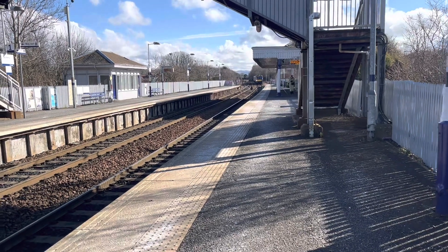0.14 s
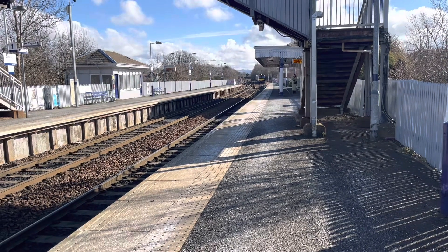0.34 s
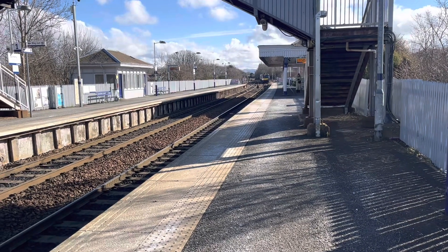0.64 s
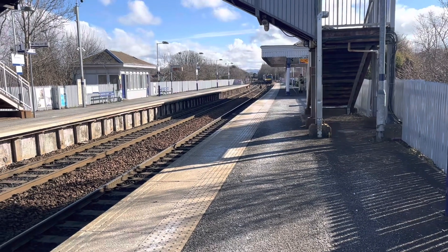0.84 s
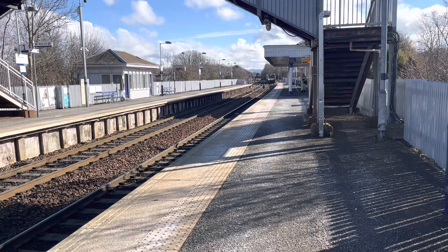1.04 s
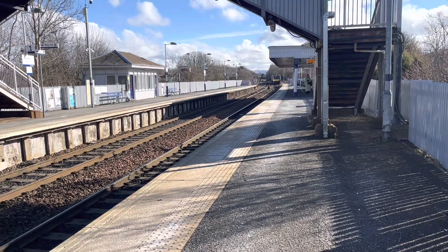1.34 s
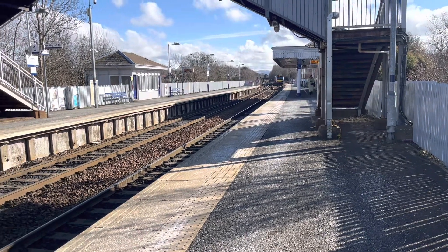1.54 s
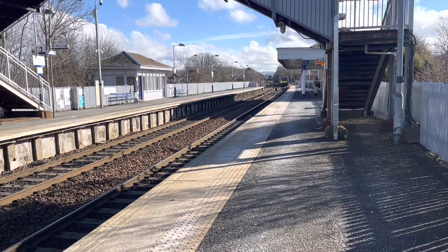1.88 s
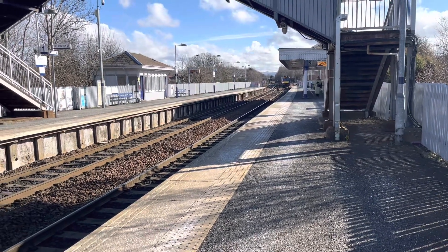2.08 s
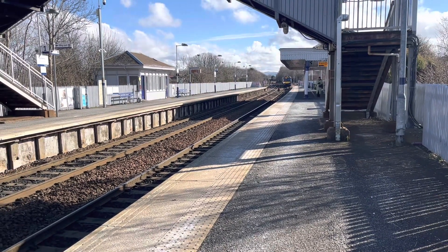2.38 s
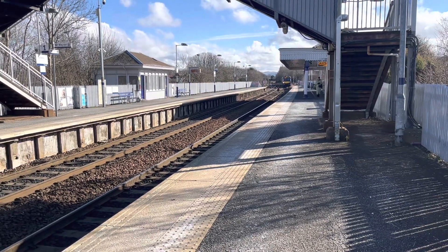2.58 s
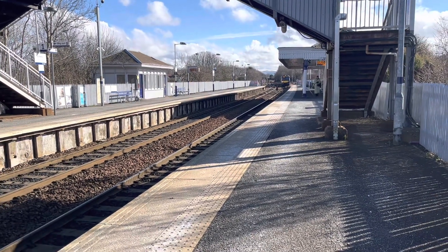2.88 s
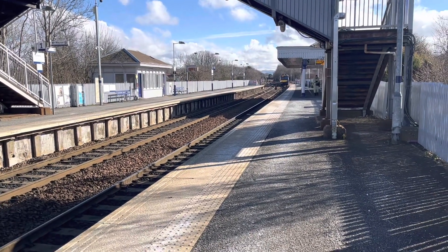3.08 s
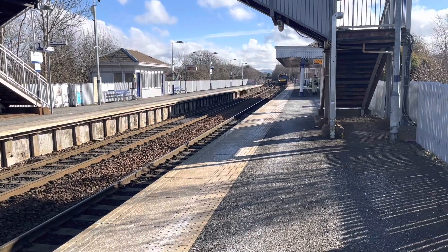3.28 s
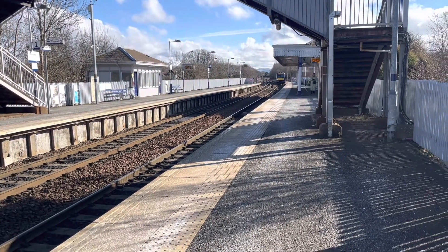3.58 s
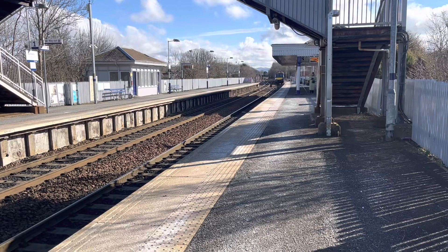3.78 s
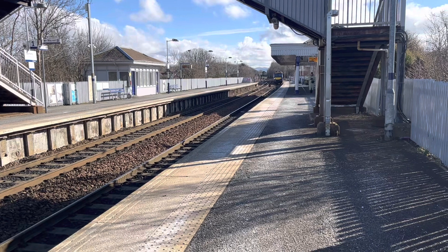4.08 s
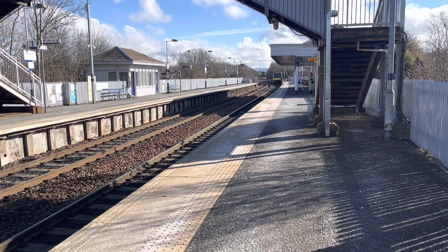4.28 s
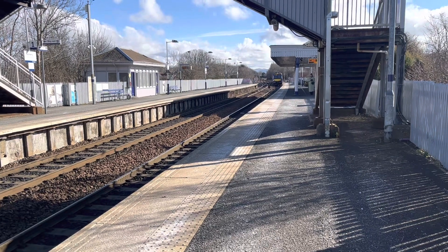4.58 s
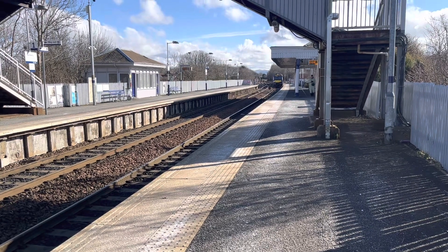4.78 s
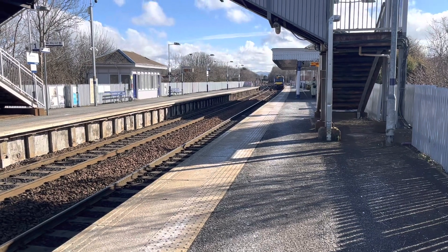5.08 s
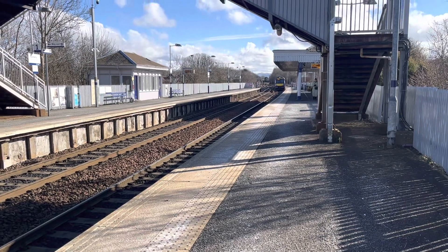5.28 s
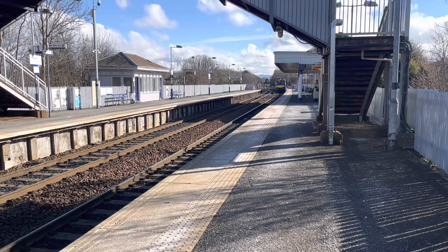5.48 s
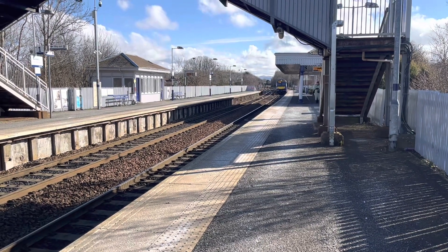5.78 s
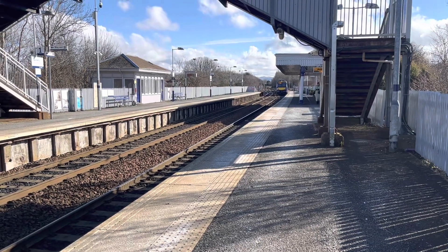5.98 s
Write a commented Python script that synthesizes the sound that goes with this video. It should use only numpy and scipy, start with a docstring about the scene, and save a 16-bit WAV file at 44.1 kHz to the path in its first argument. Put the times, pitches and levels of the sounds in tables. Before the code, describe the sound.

Low far-off train rumble with a wavering engine hum, soft wind buffets on the microphone, faint birdsong in trees and crisp nearby clicks.

```python
"""A diesel train, still far off down the line from an open station platform, heard as a roar and a hum.
The roar is noise in octave bands that swell a little apart; the hum is two sines of wandering pitch.
Narrow-band noise and short decaying swings make low gusty throbs; an airy noise hiss swells at both ends.
Gliding near-sines make small birds whistle and tick in the trees, partly returned as decaying echoes.
Dry clicks close to the microphone are short rings that dive in pitch, trailed by fine crackle."""
import sys
import numpy as np
from scipy import signal
from scipy.fft import rfft, irfft, next_fast_len
from scipy.io import wavfile

SR = 44100
rng = np.random.default_rng(int(sys.argv[2]) if len(sys.argv) > 2 else 0)


def put_to_file(sound):
    """Save the sound as 16-bit audio at rate SR, in the file named by the first command-line argument."""
    columns = np.atleast_2d(sound).T  # one column per channel
    safe = np.clip(columns, -1, 1)
    whole_steps = np.round(safe * 32767)
    wavfile.write(sys.argv[1], SR, whole_steps.astype(np.int16))


N = 270333   # length in samples


def amp(db):
    """Decibel law: 20 dB is a factor of ten in amplitude."""
    return 10 ** (np.asarray(db) / 20)


def rms_one(x):
    """Normalization of the root-mean-square value to 1."""
    return x / np.sqrt(np.mean(x ** 2) + 1e-20)


def in_time(rows):
    """Linear interpolation of each column between the times in the first one."""
    s, *columns = np.transpose(rows)
    return [np.interp(np.arange(N) / SR, s, column) for column in columns]


def band_pass(x, low_hz, high_hz, order=2):
    """Band limitation by a Butterworth filter."""
    return signal.sosfilt(signal.butter(order, [low_hz, high_hz], "band", fs=SR, output="sos"), x)


def drift(rate):
    """Random modulation: low-passed noise of rms 1, with two poles at rate in Hz."""
    step = 40   # samples between computed values
    pole = np.exp(-2 * np.pi * rate * step / SR)
    noise = rng.standard_normal(N // step + 2002)
    slow = signal.lfilter([1], [1, -2 * pole, pole ** 2], noise)[2000:]   # settled part only
    return np.interp(np.arange(N) / step, np.arange(len(slow)), rms_one(slow))


def panned(x, pan_db, lead_s=0.):
    """Stereo by level and time difference: the left is louder by pan_db and earlier by lead_s."""
    at = np.arange(N)
    left = np.interp(at + lead_s * SR, at, x)
    return np.array([amp(pan_db / 2) * left, amp(-pan_db / 2) * x])


def echoes(x, t60):
    """Scattering from trees and fences: exponentially decaying noise tails, independent on each side."""
    t = np.arange(round(.3 * SR)) / SR
    tails = rng.standard_normal((2, len(t))) * amp(-60 * t / t60) * (t > .004)
    tails /= np.sqrt(np.sum(tails ** 2, axis=1, keepdims=True))   # unit energy
    return signal.fftconvolve(x[None], tails, axes=1)[:, :N]


# Low rumble between the buffets. Each row: time in seconds, rms level in dB.
THROB_LEVEL = [(0.0, -36), (0.15, -47), (0.53, -41.5), (1.33, -43), (2.03, -44), (2.24, -40), (2.49, -43),
               (3.46, -42), (3.82, -41.5), (4.08, -35.5), (4.42, -38.5), (4.56, -40), (4.97, -38),
               (5.57, -43), (6.13, -45)]
# Low buffets, probably wind over the microphone.
# Each row: time of the peak in seconds, peak of the fundamental in dB, pitch in Hz, rise (Gaussian) in seconds.
BUFFETS = [(0.035, -42, 64.6, 0.0034), (0.671, -29, 70.6, 0.012), (1.691, -31.5, 73, 0.015),
           (2.188, -26, 71.7, 0.02), (2.24, -29.5, 55.5, 0.025), (2.313, -32, 61.4, 0.015),
           (2.501, -29.5, 88.7, 0.023), (2.684, -30.5, 72.4, 0.013), (2.786, -34.5, 69, 0.027),
           (3.109, -31, 66.5, 0.019), (3.405, -32, 67.4, 0.023), (3.85, -36, 58.4, .01),
           (3.931, -25, 62.3, 0.037), (3.994, -31, 68.7, 0.015), (4.046, -27.5, 57.4, 0.0081),
           (4.212, -26, 67, 0.015), (4.34, -32.5, 75.5, 0.013), (4.756, -28.5, 70, 0.016),
           (5.113, -33, 76.3, 0.041), (5.18, -40, 65.5, 0.013), (5.462, -33.5, 74.8, 0.065),
           (5.763, -29, 71, 0.024), (6.06, -31, 59.6, 0.011)]
# Eddies, opposite in sign in the two channels. Each row: time in seconds, mean level in dB.
EDDIES_LEVEL = [(0, -45), (.3, -52), (.6, -73.5), (2.2, -86.5), (2.4, -52.5), (2.6, -73), (3.5, -68),
                (3.75, -57.5), (4.3, -66.5), (4.7, -52), (5.0, -60), (5.7, -72.5)]
BUFFET_FALL_S = 0.0084   # Gaussian fall of a buffet of -32 dB
FALL_GROWTH = 0.89   # stronger buffets die away more slowly, dB of time per dB
BUFFET_OCTAVE_DB = -17   # lopsided swings add the octave


def buffets():
    """Transient oscillation: a few low swings under a Gaussian rise and a Gaussian fall."""
    out, t = np.zeros(N), np.arange(N) / SR
    start_phases = rng.uniform(0, 2 * np.pi, len(BUFFETS))
    for (s, db, hz, rise_s), start_phase in zip(BUFFETS, start_phases):
        near = slice(max(round((s - .15) * SR), 0), round((s + .2) * SR))
        since = t[near] - s
        fall_s = BUFFET_FALL_S * amp(FALL_GROWTH * (db + 32.0))
        shape = np.exp(-.5 * (since / np.where(since < 0, rise_s, fall_s)) ** 2)
        phase = 2 * np.pi * hz * since + start_phase
        swings = np.sin(phase) + amp(BUFFET_OCTAVE_DB) * np.cos(2 * phase)
        out[near] += amp(db) * shape * swings
    return out


def throb():
    """Modulated narrow-band noise with buffets, common to both channels, plus antiphase eddies."""
    level_db, = in_time(THROB_LEVEL)
    eddies_db, = in_time(EDDIES_LEVEL)
    shared, own = band_pass(rng.standard_normal((2, N)), 48, 90)
    rumble = rms_one(shared * amp(2.0 * drift(9.3))) * amp(level_db)
    eddies = rms_one(own) * amp(eddies_db + 2.5 * drift(6.7))
    return rumble + buffets() + eddies * np.array([[1], [-1]])


# Airy hiss in the treble. Each row: time in seconds, mean level in dB.
AIRY_LEVEL = [(0, -69), (.42, -70.5), (.56, -88.5), (5.1, -102), (5.28, -78), (5.5, -100), (5.66, -99),
              (5.71, -79), (5.86, -72.5), (5.94, -67.5), (5.98, -75), (6.13, -79)]


def airy():
    """Broad-band noise, grainy by fast modulation, strongest low down; precedence places it at the left."""
    level_db, = in_time(AIRY_LEVEL)
    grainy = amp(1.3 * drift(250.0)) * rng.standard_normal((2, N))
    shared, own = band_pass(grainy, 1300, 13800)
    hiss = shared + 0.2 * own * np.array([[1], [-1]])
    lower_part = signal.sosfilt(signal.butter(2, 4000, fs=SR, output="sos"), hiss)
    hiss = hiss + amp(8.5) * lower_part
    hiss[1] = np.roll(hiss[1], 1)   # it reaches the right microphone a sample later
    return rms_one(hiss) * amp(level_db + 2.1 * drift(6.4))


def whistles(notes, flutter_db, wobble_hz, swell_db, fade_db, scoop_hz=0, scoop_s=.01,
             glide_hz_per_s=0, overtone_db=-60):
    """Frequency modulation: near-sines scoop into pitch, glide, swell and fade; scattering makes them flutter."""
    out = np.zeros(N)
    flutter = amp(flutter_db * (.7 * drift(20.0) + .7 * drift(90.0)))
    wobble = wobble_hz * drift(90.0)
    scoops = np.broadcast_to(scoop_hz, len(notes))
    glides = np.broadcast_to(glide_hz_per_s, len(notes))
    for (s, length, hz, db, loudest), scoop, glide in zip(notes, scoops, glides):
        at, t = round(s * SR), np.arange(round(length * SR)) / SR
        pitch = hz + scoop * np.exp(-t / scoop_s) + glide * t + wobble[at:at + len(t)]
        phase = 2 * np.pi * np.cumsum(pitch) / SR
        below_peak_db = np.interp(t / length, [0, np.clip(loudest, .02, .98), 1], [swell_db, 0, fade_db])
        ends = np.clip(np.minimum(t, length - t) / .007, 0, 1)
        voice = np.sin(phase) + amp(overtone_db) * np.sin(2 * phase)
        out[at:at + len(t)] += np.sqrt(2) * amp(db - below_peak_db) * ends * voice
    return out * flutter


def sung(curves, flutter_db, wobble_hz, overtone_db=-60):
    """Frequency modulation: near-sines follow pitch and level curves; scattering makes them flutter."""
    out, wobble = np.zeros(N), wobble_hz * drift(90.0)
    for s, hz, db in map(np.transpose, curves):
        t = np.arange(round((s[-1] - s[0]) * SR)) / SR
        at = round(s[0] * SR)
        near = slice(at, at + len(t))
        pitch = np.interp(t + s[0], s, hz) + wobble[near]
        phase = 2 * np.pi * np.cumsum(pitch) / SR
        ends = np.clip(np.minimum(t, t[-1] - t) / .004, 0, 1)
        voice = np.sin(phase) + amp(overtone_db) * np.sin(2 * phase)
        out[near] += np.sqrt(2) * amp(np.interp(t + s[0], s, db)) * ends * voice
    return out * amp(flutter_db * drift(150.0))


# Faint far-off birds that blur together: notes per second, lowest note level in dB, range of first pitches in Hz.
TWITTER_PER_S, TWITTER_FLOOR_DB, TWITTER_HZ = 30.0, -92, (4200, 5700)


def twitter():
    """Random superposition: short faint notes at chance moments and pitches, falling or rising."""
    count = round(TWITTER_PER_S * N / SR)
    moment, length, pitch, level, glide = rng.random((count, 5)).T
    notes = np.transpose([moment * (N / SR - .1),
                          .02 + .06 * length,
                          np.interp(pitch, [0, 1], TWITTER_HZ),
                          TWITTER_FLOOR_DB + 6 * level,
                          np.full(count, .4)])
    return whistles(notes, 4.0, 120, swell_db=6, fade_db=6, glide_hz_per_s=12000 * (glide - .7))


# Upward ticks of a small bird. Each row: start in seconds, peak in dB.
TICK_TIMES = [(2.123, -65), (2.305, -66.5), (4.859, -65), (4.972, -66), (5.065, -66), (5.196, -68)]


def ticks():
    """Linear chirp: each tick sweeps upward within a hundredth of a second."""
    out, t = np.zeros(N), np.arange(round(.009 * SR)) / SR
    sweep = np.hanning(len(t)) * signal.chirp(t, 5800, t[-1], 7900)
    for s, db in TICK_TIMES:
        at = round(s * SR)
        out[at:at + len(t)] += amp(db) * sweep
    return out


# Whistles that climb in steps, one curve each. Each row of a curve: time in seconds, pitch in Hz, level in dB.
RISING_CURVES = [
    [(.3, 3540, -80), (.345, 3570, -77), (.37, 3800, -74), (.422, 3940, -71), (.462, 3880, -77),
     (.49, 4060, -80), (.55, 4140, -86)],
    [(1.8, 3850, -87), (1.836, 3950, -73), (1.847, 4000, -79), (1.89, 4070, -62.5), (1.93, 4070, -79),
     (1.95, 4100, -81.5), (2.01, 4130, -79.5), (2.056, 4155, -84)],
    [(3.755, 3350, -80), (3.787, 3800, -76.5), (3.855, 3860, -73), (3.875, 3940, -74), (3.913, 4030, -72),
     (3.927, 4060, -85), (3.94, 4050, -71.5), (3.975, 4200, -81), (4.05, 4240, -81)],
    [(5.418, 3560, -88), (5.435, 3740, -70), (5.465, 3730, -80.5), (5.505, 3910, -72), (5.528, 4120, -76),
     (5.562, 3980, -70), (5.584, 4220, -69), (5.63, 4100, -73), (5.692, 4240, -82)],
]
# Low rising notes that follow the whistles. Each row: start in seconds, length in seconds,
# first pitch in Hz, loudest level in dB, loudest point as a share of the length.
LOW_NOTES = [(.78, 0.07, 2800, -78, .5), (2.07, 0.16, 2706, -73, 0.65), (4.07, 0.12, 2716, -71.5, 0.74),
             (5.75, 0.14, 2700, -73, 0.31)]
# Short notes, mostly falling. Each row: start in seconds, length in seconds, pitch in Hz, loudest level in dB,
# loudest point as a share of the length, starting offset of the pitch in Hz, sag in Hz per second.
SHORT_NOTES = [(.11, 0.091, 4200, -82, .3, 0, 500), (0.283, 0.072, 3150, -76, .6, 0, 4002),
               (0.3, .025, 3950, -75, .4, 100, 3000), (0.574, 0.084, 5060, -75, .4, -150, 5996),
               (0.663, 0.04, 4240, -78, 0.28, -150, 3000), (2.887, 0.053, 4780, -73.5, 0.7, 505, 502),
               (3.014, 0.029, 4830, -72.5, 0.51, 300, 299), (3.32, .045, 4950, -89, .6, 148, 2002),
               (4.186, 0.07, 4580, -71, 0.32, -350, 5000), (4.715, 0.11, 4940, -75.5, 0.43, -150, 2987.5),
               (5.092, 0.071, 5100, -77.5, 0.44, 300, 1008), (5.395, 0.045, 4750, -76.5, .4, -200, -2000),
               (5.714, 0.064, 4660, -69, 0.65, -300, 2497), (5.943, 0.059, 1925, -65, .4, 0, -4000)]
LOW_CLIMB_HZ_PER_S, SHORT_SCOOP_S = 2200, 0.011


def songbird():
    """Superposition of pitch glides: rising whistles, low notes and short notes of a bird farther off."""
    *short, scoop_hz, sag = np.transpose(SHORT_NOTES)
    rising = sung(RISING_CURVES, 3.8, 45)
    low = whistles(LOW_NOTES, 3.5, 35, swell_db=5, fade_db=6, glide_hz_per_s=LOW_CLIMB_HZ_PER_S)
    brief = whistles(np.transpose(short), 4.0, 65, swell_db=8.5, fade_db=4,
                     scoop_hz=scoop_hz, scoop_s=SHORT_SCOOP_S, glide_hz_per_s=-sag)
    return rising + low + brief


# Lower voice of two-voiced calls. Each row of a curve: time in seconds, pitch in Hz, level in dB.
LOWER_VOICE = [
    [(.915, 5930, -77), (.937, 5710, -59.5), (.979, 5711, -79), (1.009, 5660, -64.5), (1.035, 5460, -66),
     (1.05, 5360, -90)],
    [(1.863, 5770, -74), (1.878, 5590, -67.5), (1.946, 5640, -65.5), (1.964, 5550, -81), (2.03, 5410, -84)],
    [(3.14, 5880, -82), (3.154, 5660, -72), (3.216, 5640, -69), (3.24, 5570, -70), (3.265, 5500, -73),
     (3.295, 5520, -78)],
    [(3.392, 5930, -76), (3.41, 5820, -66), (3.5, 5600, -73.5), (3.512, 5660, -91), (3.525, 5700, -85),
     (3.59, 5700, -80)],
    [(5.268, 5830, -74), (5.292, 5790, -67.5), (5.34, 5630, -64), (5.364, 5644, -61.5), (5.39, 5350, -75),
     (5.415, 5500, -73.5)],
]
# Upper voice of the calls. Each row of a curve: time in seconds, pitch in Hz, level in dB.
UPPER_VOICE = [
    [(.922, 6120, -73), (.985, 6125, -66), (1.01, 6070, -77), (1.03, 6000, -68), (1.07, 5980, -87)],
    [(1.878, 5860, -84), (1.909, 5940, -73.5), (1.935, 6080, -79), (1.985, 6135, -84), (2.0, 6120, -92)],
    [(3.133, 5990, -84), (3.145, 5945, -67), (3.18, 5970, -69), (3.211, 6075, -72), (3.24, 6000, -74),
     (3.28, 6000, -86)],
    [(3.408, 5850, -76), (3.428, 6020, -71), (3.45, 6070, -82), (3.5, 6055, -87)],
    [(5.27, 6060, -81), (5.336, 6068, -77), (5.4, 6095, -84)],
]


def two_voices():
    """Two independent oscillators: a falling lower voice with an arching one just above it."""
    return sung(LOWER_VOICE, 2.5, 35, overtone_db=-36.0) + sung(UPPER_VOICE, 4.7, 55, overtone_db=-30.0)


# Thin high notes. Each row: start in seconds, length in seconds, first pitch in Hz,
# loudest level in dB, loudest point as a share of the length.
HIGH_NOTES = [(2.01, 0.13, 8250, -70, .7)]


def birds():
    """Direct and scattered sound: four panned singers and a far twitter, partly returned by the trees."""
    near, far, tick = two_voices(), songbird(), ticks()
    high = whistles(HIGH_NOTES, 3.0, 30, swell_db=7, fade_db=2, glide_hz_per_s=-1500)
    direct = panned(near, 1.5, lead_s=.00006) + panned(far, 8.4, lead_s=.00004)
    direct += panned(high, .1, lead_s=.00006) + panned(tick, .1, lead_s=.00004)
    returned = amp(-4) * echoes(near, t60=.33) + amp(-2) * echoes(far, t60=0.3)
    returned += amp(-3) * echoes(tick, t60=.2)
    return direct + returned + echoes(twitter(), t60=.25)   # the twitter is heard only scattered


# Dry clicks nearby. Each row: start in seconds, peak of the ring in dB, ring pitch in Hz, left minus right in dB.
CLICK_RINGS = [(.656, -65, 7000, 2), (.962, -53, 5600, -1), (1.321, -57, 5960, -2), (1.468, -56, 6000, -13),
               (1.468, -59, 12300, 0), (1.472, -53, 9800, -1), (1.485, -56, 12500, 0),
               (1.488, -45, 4620, 6), (1.499, -46.5, 3700, 8), (1.4995, -61, 10300, 0),
               (1.575, -53, 3400, 5), (1.621, -60.5, 3500, 11), (1.512, -67, 5000, 3),
               (1.535, -68, 9800, 9), (1.675, -61, 5170, 7), (1.841, -59, 2500, -2), (1.881, -63, 4600, 0),
               (2.045, -74, 7000, 4), (2.25, -56.5, 4440, 2), (2.278, -72, 7000, 1), (3.128, -64, 4820, 15),
               (3.219, -47.5, 1700, -6), (3.221, -60, 3000, -2), (3.445, -49.5, 1160, 3),
               (3.447, -43.5, 1770, 1), (3.45, -43.5, 2180, 2), (4.273, -49.5, 9300, -1),
               (4.28, -50, 4830, -19), (4.2847, -42.5, 4070, 10), (4.292, -73, 9400, -1),
               (4.309, -58, 4300, 2), (4.341, -46, 2930, 4), (4.349, -53, 2600, -4), (4.378, -58, 4000, 1),
               (4.384, -49.5, 2200, 3.5), (4.398, -56, 4200, -2), (4.407, -48.5, 4360, 3),
               (4.438, -54, 3400, 0), (4.461, -62, 5100, 8), (4.481, -63, 2300, 0), (5.241, -65.5, 5000, 5),
               (5.573, -63, 6000, -8), (5.833, -63, 2850, 2), (5.908, -58, 2870, 0), (5.937, -54, 3340, -8),
               (5.994, -54, 3700, 3), (6.001, -61, 3860, -15), (6.076, -53, 3470, -4),
               (6.084, -60, 3700, 0)]
CLICK_CYCLES, CLICK_DIVE = 1.27, 0.16   # cycles to the ring's peak; share by which it starts above its pitch
# Bright edge: dB against the ring at 4 kHz, gain per octave of ring pitch, low-pass of its noise.
EDGE_DB, EDGE_DB_PER_OCTAVE, EDGE_CUT_HZ = -20, 6.0, 9100
# Crackle: grains per second, decay time constant in seconds, dB against the ring before band-pass and gain.
CRACKLE_PER_S, CRACKLE_S, CRACKLE_DB = 600, .05, -18


def crackle(trail):
    """Shot noise: random grains, fewer than the samples, under exponentially decaying trails."""
    decay = np.exp(-1 / (CRACKLE_S * SR))
    envelope = signal.lfilter([1], [1, -decay], trail + 1e-18)
    grains = envelope * (rng.random(N) < CRACKLE_PER_S / SR) * rng.standard_normal((2, N))
    return band_pass(grains, 2200, 6000, order=4) * amp(14)


def clicks():
    """Damped resonance: each dry ring dives in pitch, with a thin bright noise edge and trailing crackle."""
    out, trail = np.zeros((2, N)), np.zeros(N)
    t = np.arange(round(.008 * SR)) / SR
    noise = rng.standard_normal((len(CLICK_RINGS), 2, len(t)))
    grit = signal.lfilter(*signal.butter(2, EDGE_CUT_HZ, fs=SR), noise)
    for (s, db, hz, pan_db), (shared, own) in zip(CLICK_RINGS, grit):
        age = t * hz / CLICK_CYCLES
        cycles = hz * t + CLICK_DIVE * CLICK_CYCLES * (1 - np.exp(-age))
        ring = np.sin(2 * np.pi * cycles) * age * np.exp(1 - age)
        edge = amp(EDGE_DB + EDGE_DB_PER_OCTAVE * np.log2(hz / 4000)) * np.exp(-t / 0.001)
        common = np.outer(amp([pan_db / 2, -pan_db / 2]), ring + edge * shared)
        opposite = np.outer([1, -1], 1.5 * edge * own)
        at = round(s * SR)
        out[:, at:at + len(t)] += amp(db) * (common + opposite)
        trail[at] = amp(db + CRACKLE_DB)
    out += crackle(trail)
    return out + amp(-8) * echoes(out.mean(axis=0), t60=.16)


# Engine hum. Each row: pitch in Hz, level in dB, rms wander of the pitch in Hz.
HUM_TONES = [(291.5, -54.5, 1.48), (591.4, -66.5, 4.0)]


def tone(hz, wobble_hz, rate):
    """Random frequency modulation of a sine of rms 1."""
    return np.sqrt(2) * np.sin(2 * np.pi * np.cumsum(hz + wobble_hz * drift(rate)) / SR)


def hum():
    """Propagation through moving air: the long way makes the engine tones unsteady."""
    tones = sum(amp(db + 0.093 * drift(34.0)) * tone(hz, wander_hz, rate=8.4)
                for hz, db, wander_hz in HUM_TONES)
    return panned(tones, 0.0, lead_s=-0.00057)


# Distant roar of train and town. Each row: time in seconds, level in dB, lift of its treble in dB.
ROAR_LEVEL = [(0, -45.5, 4), (0.6, -46, 2.5), (1.14, -46, -1), (2.09, -45, 1.5), (3.15, -43.5, 0),
              (3.7, -45, 2.5), (4.5, -45, 2), (5.6, -43, -0.5), (6.13, -44, 1.5)]
# Colour of the roar. Each row: frequency in Hz, relative spectral density in dB.
ROAR_SPECTRUM = [(60, -8.5), (150, 3), (230, -1), (320, 2.5), (360, -3.5), (540, -5.5), (750, -6),
                 (1550, -15), (1720, -22.5), (2300, -28.5), (4800, -39), (6000, -47.5), (7200, -58),
                 (12500, -61.5)]
# How the two microphones hear it. Each row: frequency in Hz, likeness from 0 to 1,
# phase lead of the left in radians, left minus right in dB.
MICROPHONE_PAIR = [(59.7, 1, -1, 1), (169, 0.87, 0.09, 1.5), (386, 0.89, 1, -0.5), (450, 0.1, -1.5, 2.5),
                   (750, 0.48, -3, -1), (1180, 0.5, -4.5, -4), (1515, 0.7, -5, -8), (1840, 0.99, -4.5, 6),
                   (2140, 0.6, -7, -0.5), (3940, 0, -2.5, 4), (6060, 0.83, -1, 3),
                   (9400, 0.91, -39.5, -2.5), (10700, 0.1, 2, 2), (12400, 0.7, -24.5, 0.5)]


def roar():
    """Partly coherent diffuse field: broad noise in octave bands that swell a little apart."""
    level_db, lift_db = in_time(ROAR_LEVEL)
    size = next_fast_len(N)
    hz = np.maximum(np.fft.rfftfreq(size, 1 / SR), 1)

    def over_log_hz(table, column):
        table = np.array(table)
        return np.interp(np.log(hz), np.log(table[:, 0]), table[:, column])

    shared, apart = rfft(rng.standard_normal((2, size)))
    alike = np.clip(over_log_hz(MICROPHONE_PAIR, 1), 0, 1)
    lead = np.exp(1j * over_log_hz(MICROPHONE_PAIR, 2))
    balance = amp(over_log_hz(MICROPHONE_PAIR, 3) / 2)
    left = (alike * lead * shared + np.sqrt(1 - alike ** 2) * apart) * balance
    both = np.array([left, shared / balance]) * amp(over_log_hz(ROAR_SPECTRUM, 1))
    out = 0
    for octave in range(6, 15):   # centred on 2 ** octave Hz
        window = np.cos(np.pi / 2 * np.clip(np.log2(hz) - octave, -1, 1)) ** 2
        band = irfft(both * window, size)[:, :N]
        swell_db = .55 * drift(1.5) + .9 * drift(8.0)
        treble_share = np.clip((octave - 9) / 2, 0, 1)
        out = out + band * amp(swell_db + lift_db * treble_share)
    return rms_one(out) * amp(level_db)


def scene():
    """Linear superposition of all sources."""
    return throb() + airy() + birds() + clicks() + hum() + roar()


def record(dry):
    """Linear filtering: the microphone drops the deepest bass, dips in the treble and cuts the top."""
    thin = signal.sosfilt(signal.butter(2, 32, "high", fs=SR, output="sos"), dry)
    thin = thin - .7 * signal.lfilter(*signal.iirpeak(8300, 5.0, fs=SR), thin)
    # 40 dB down from 14.7 kHz upward
    return signal.sosfilt(signal.cheby2(10, 40, 14700, fs=SR, output="sos"), thin)


dry = scene()
out = record(dry)
put_to_file(out)
```